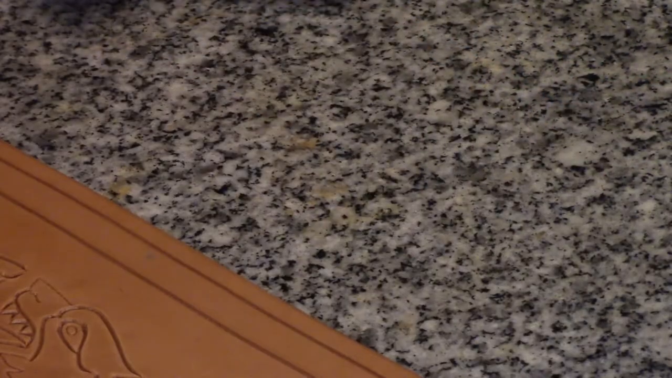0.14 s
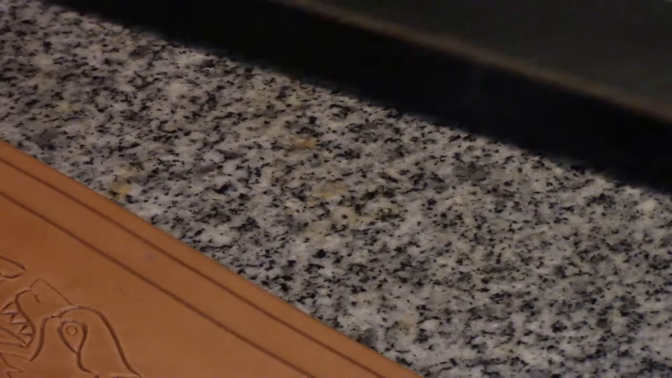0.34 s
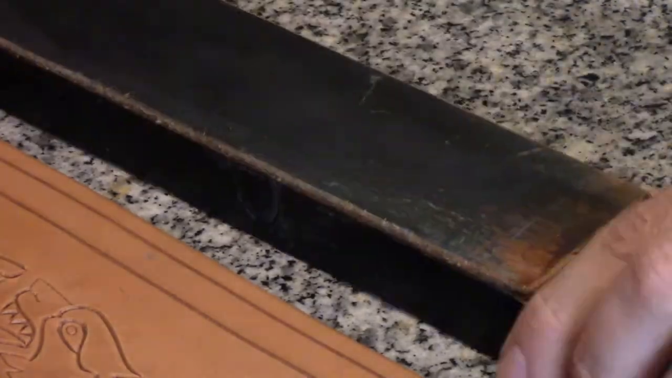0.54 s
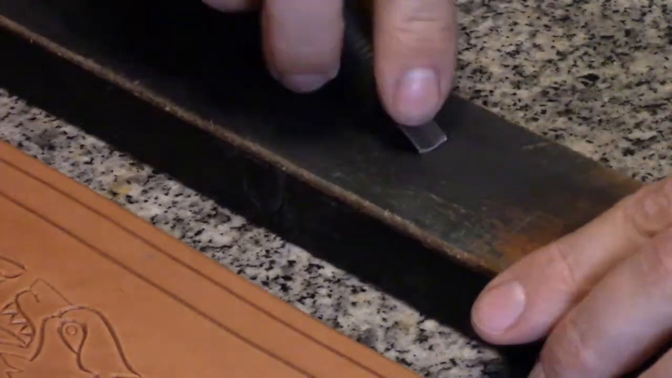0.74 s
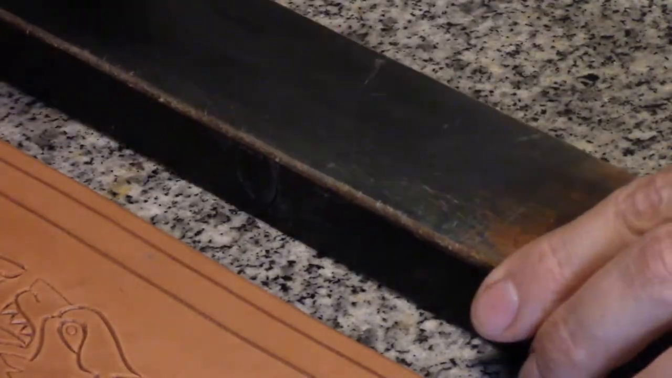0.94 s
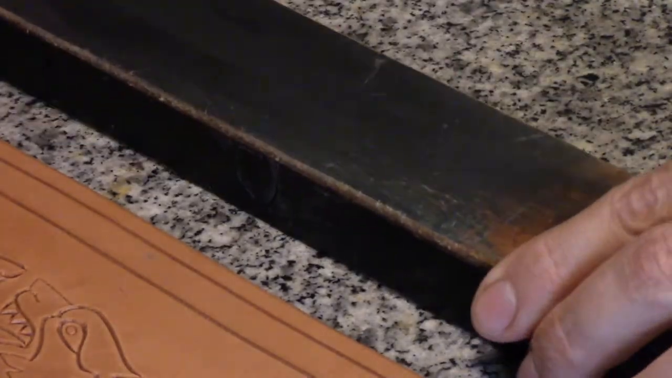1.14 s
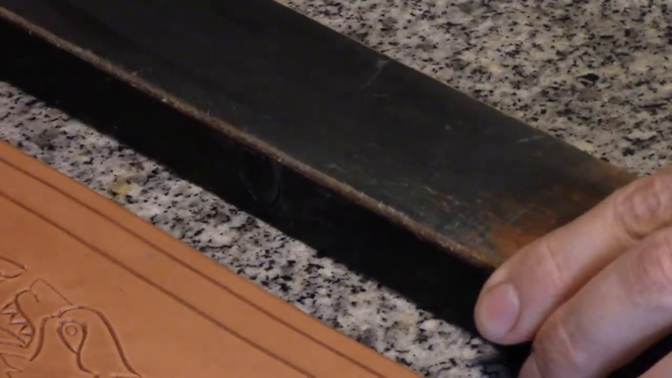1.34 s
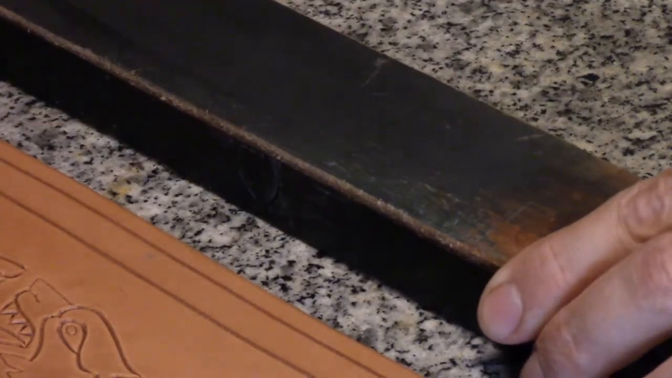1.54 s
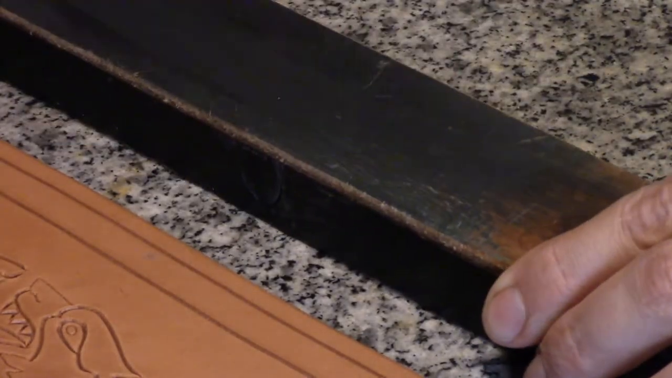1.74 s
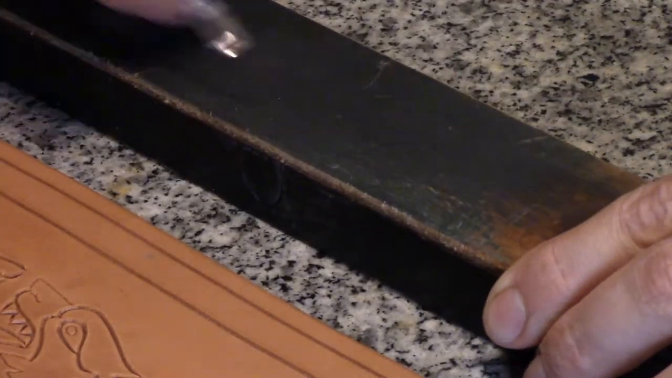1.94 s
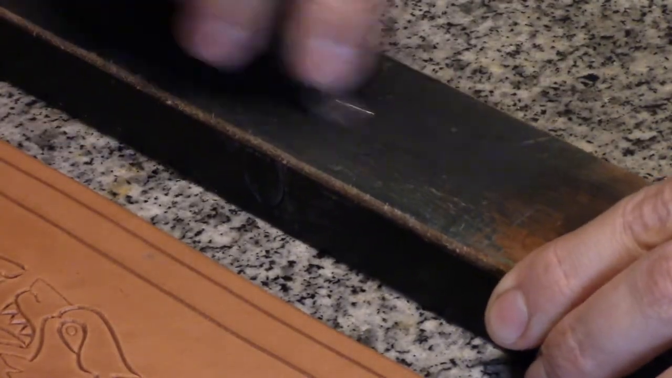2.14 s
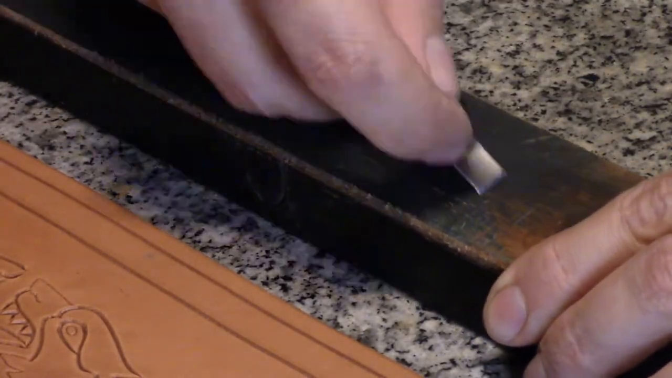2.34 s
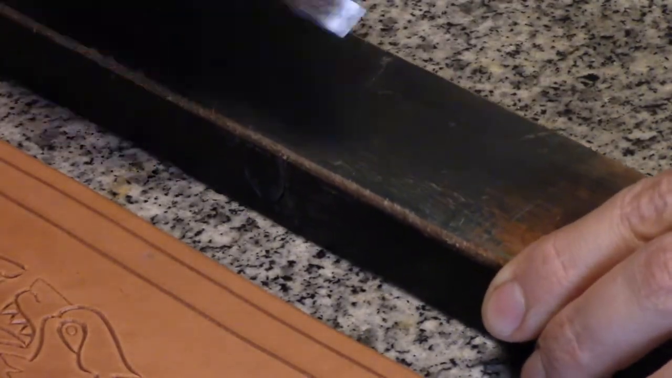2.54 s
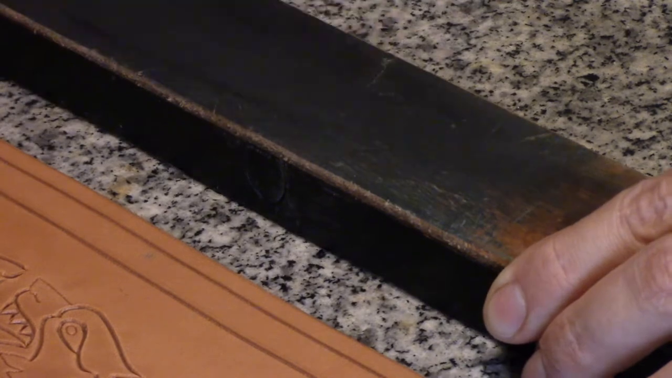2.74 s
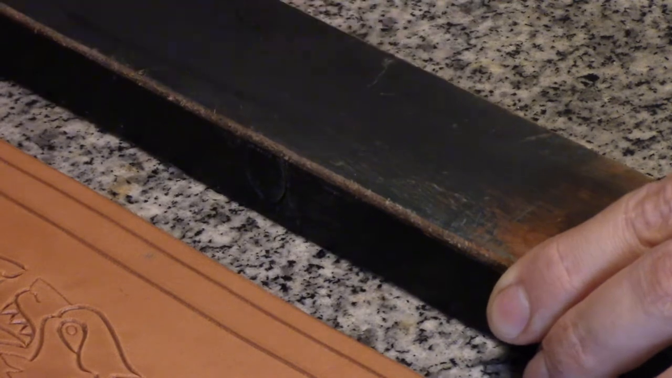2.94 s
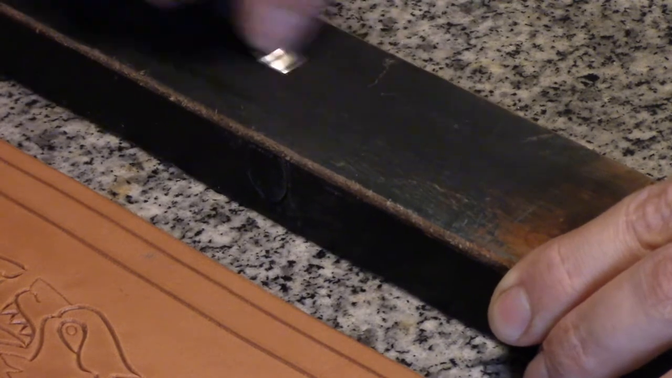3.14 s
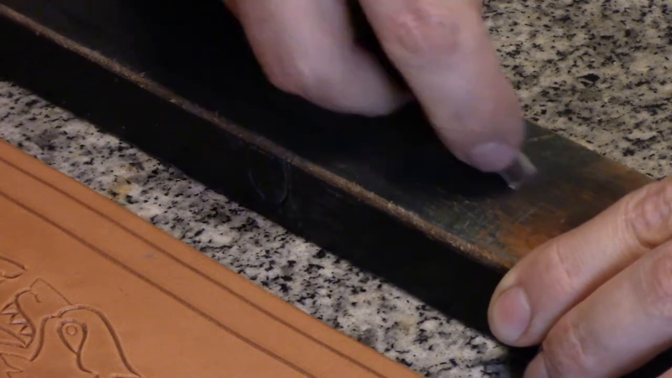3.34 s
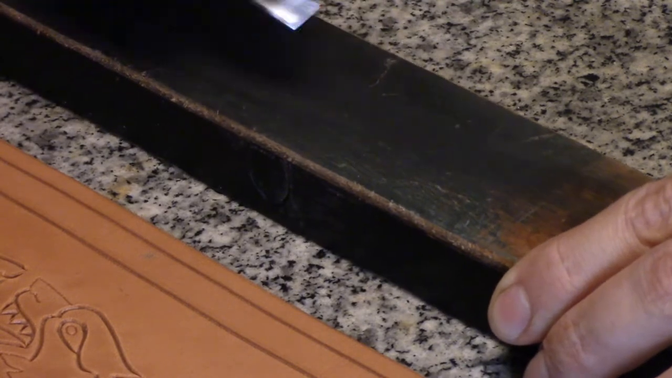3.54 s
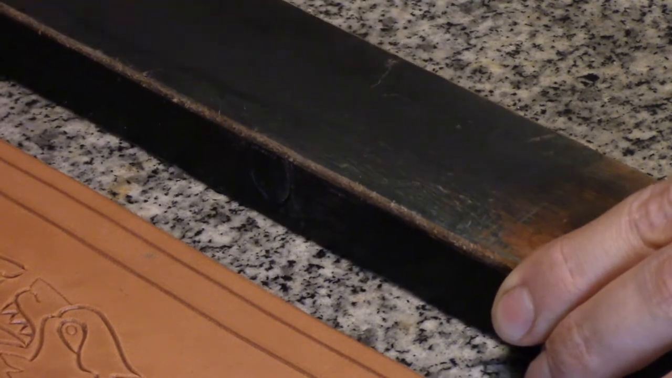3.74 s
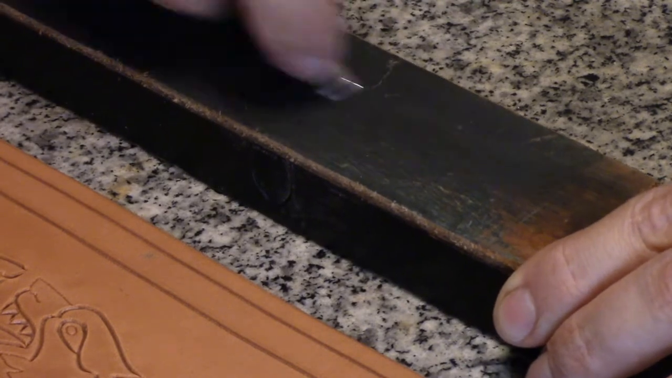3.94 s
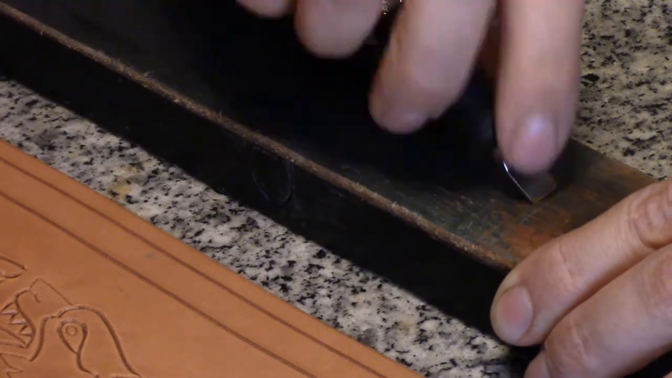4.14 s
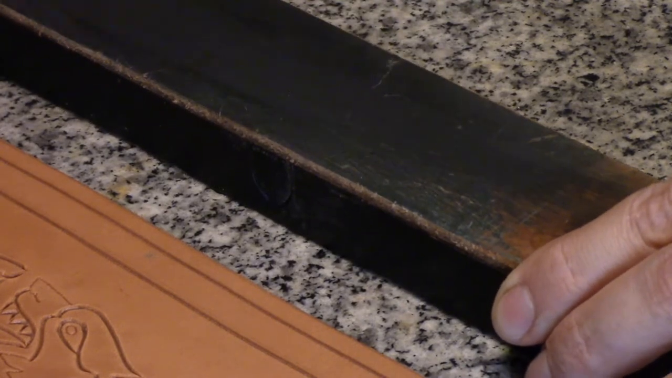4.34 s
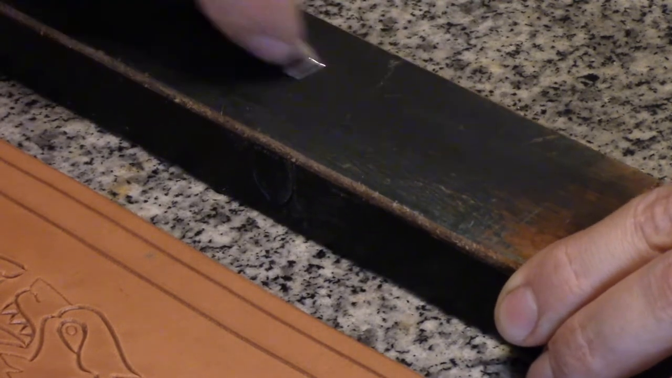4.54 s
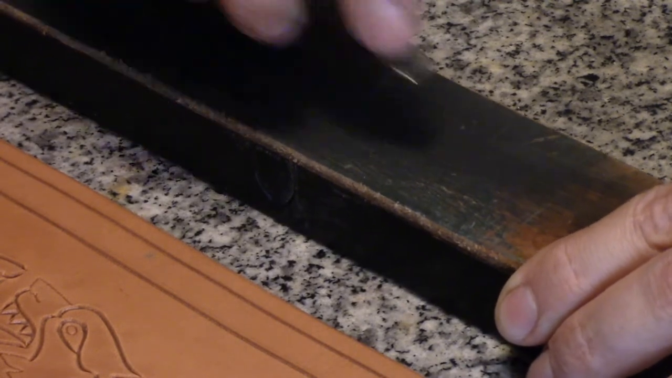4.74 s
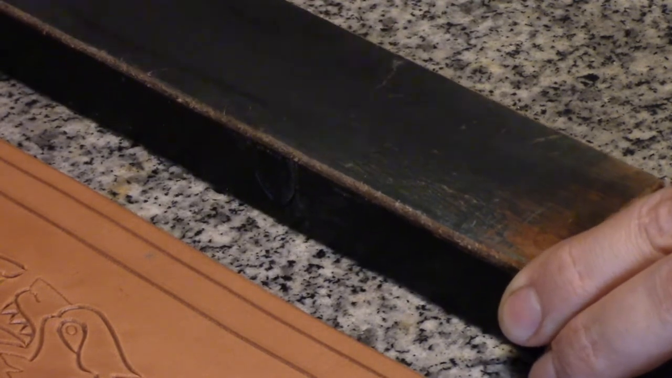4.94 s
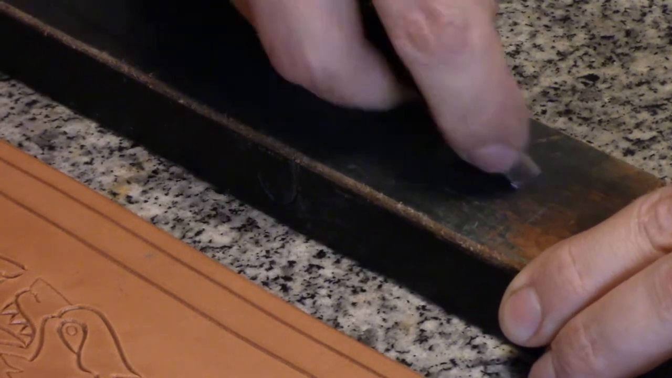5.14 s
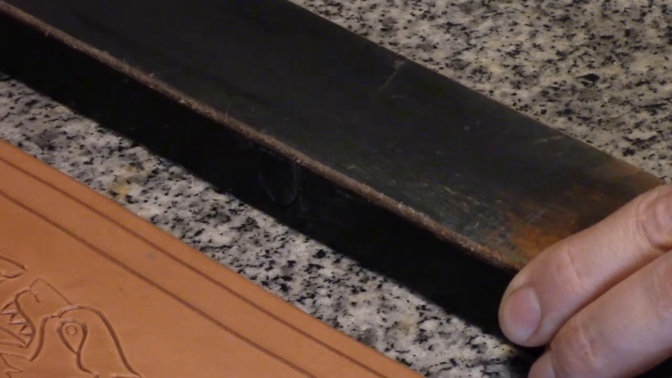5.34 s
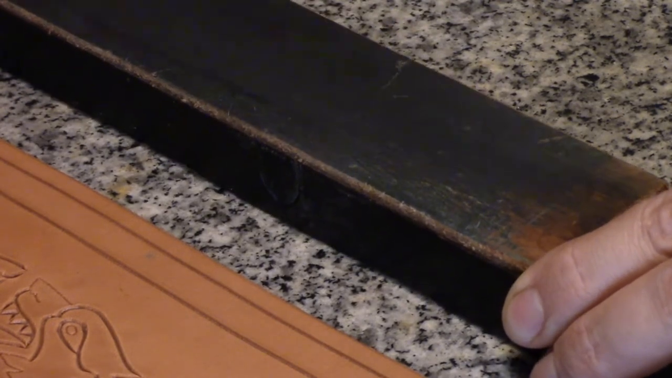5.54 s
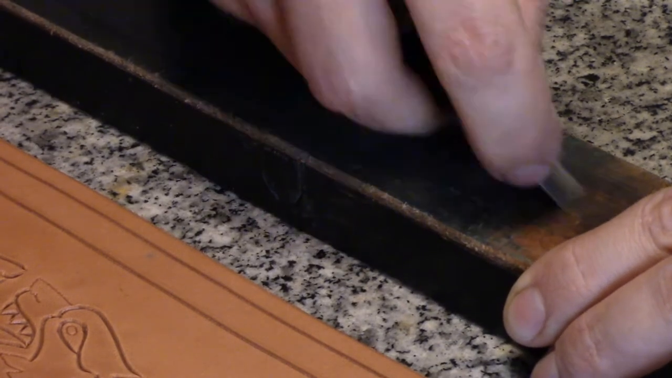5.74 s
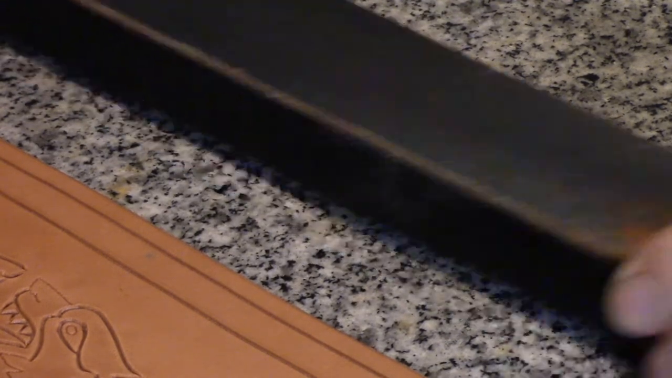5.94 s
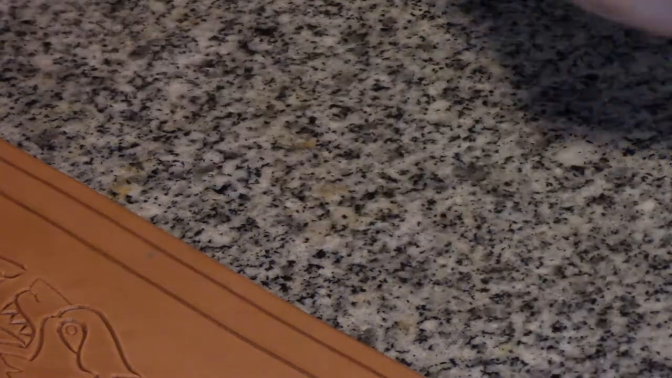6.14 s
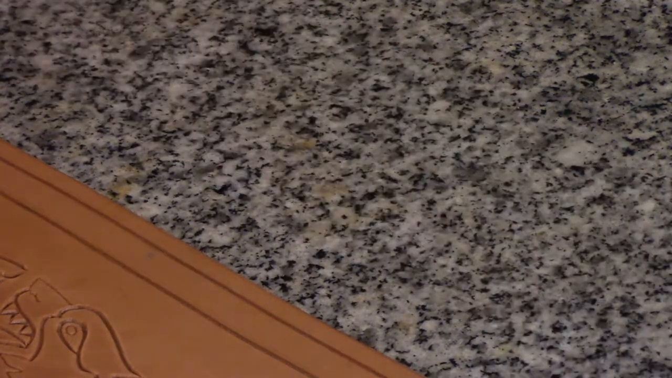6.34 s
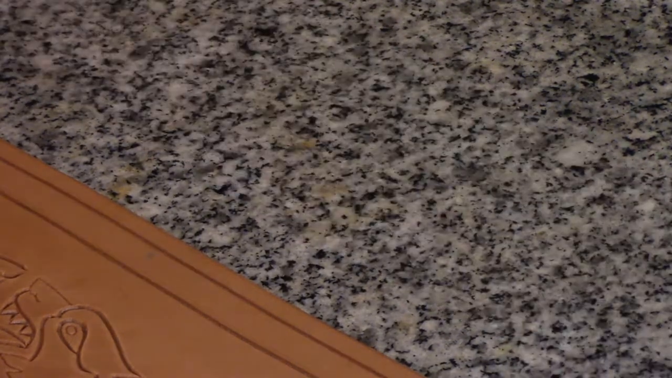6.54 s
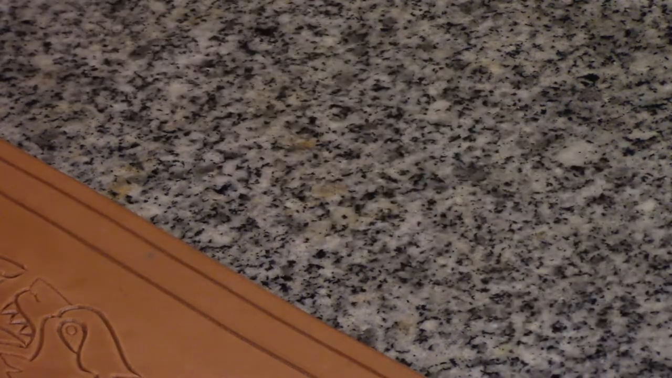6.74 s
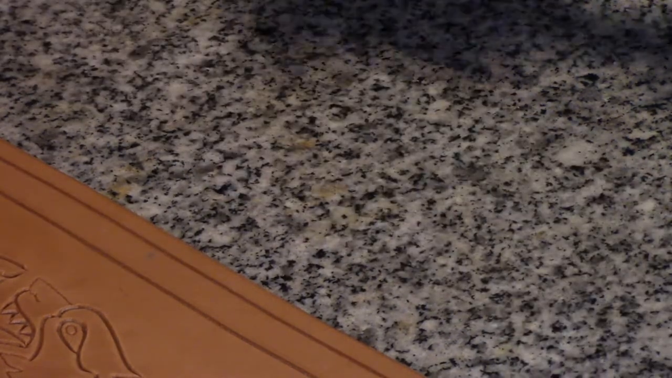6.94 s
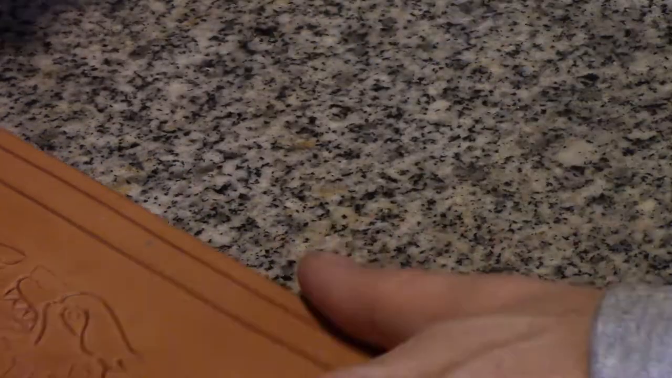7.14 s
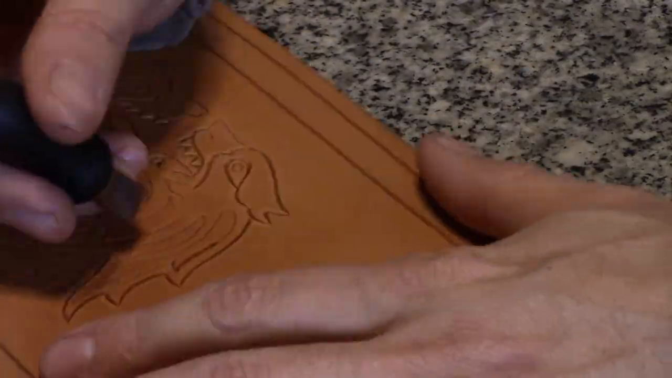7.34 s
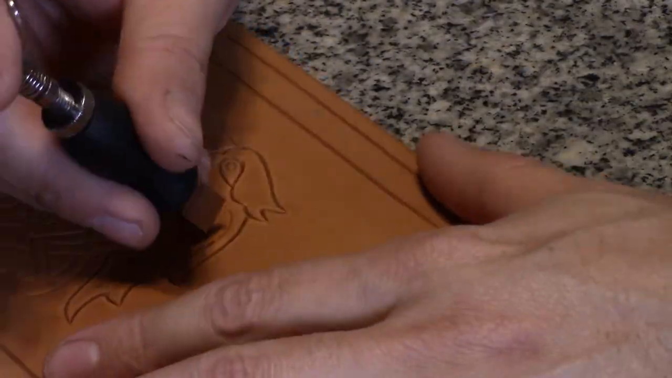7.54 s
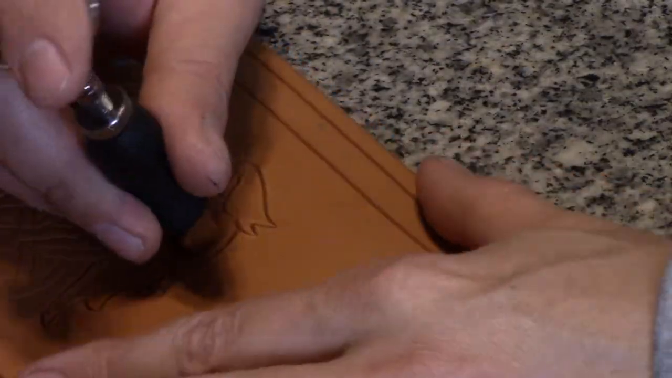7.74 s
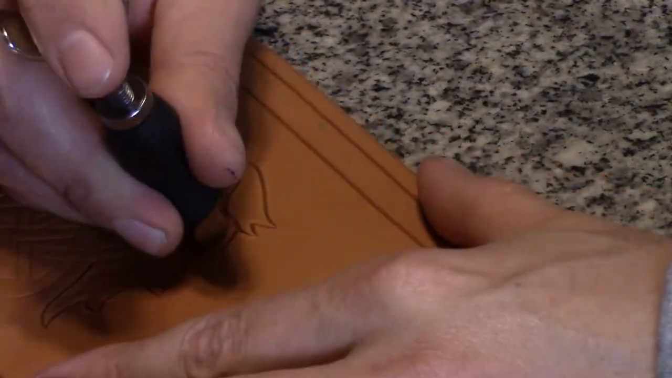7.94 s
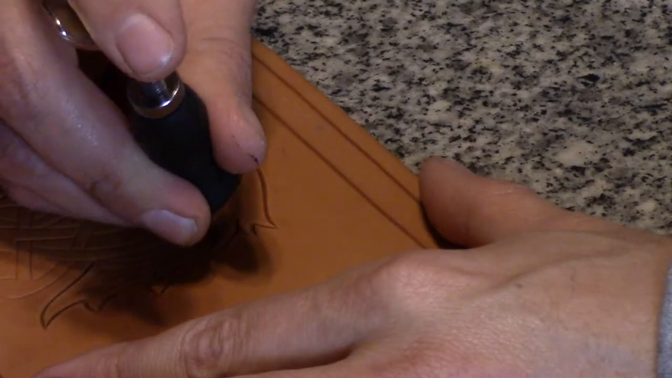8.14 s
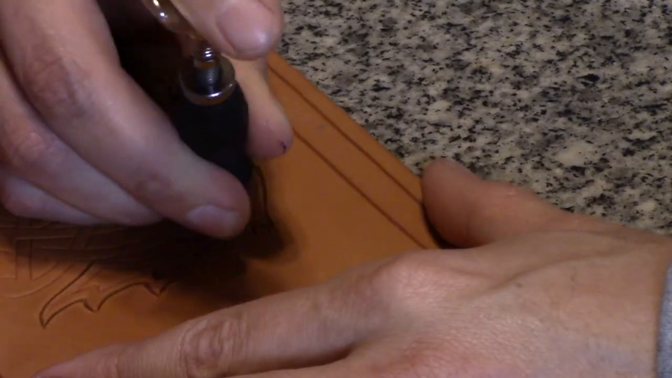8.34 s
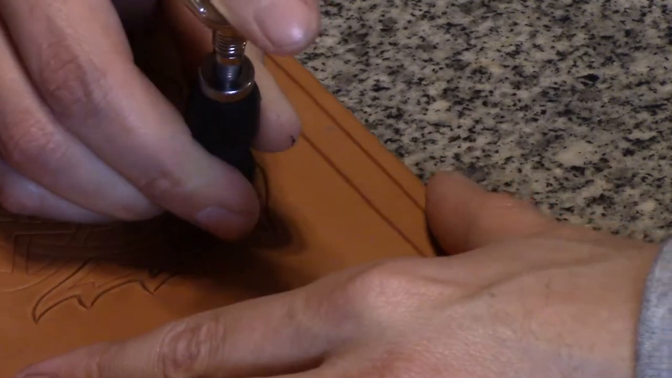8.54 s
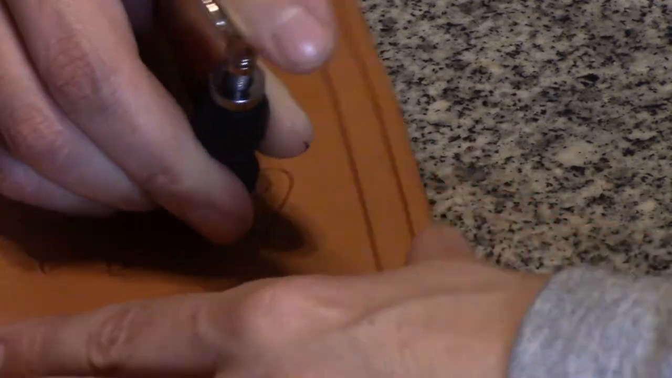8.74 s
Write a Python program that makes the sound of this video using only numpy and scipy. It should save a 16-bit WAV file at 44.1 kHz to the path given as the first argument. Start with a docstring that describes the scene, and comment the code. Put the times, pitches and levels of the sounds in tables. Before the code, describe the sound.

Close and dry: a sharp wooden clack on stone, an instant raspy squawk and a bright little clink. Small blade ticks come several times a second at first, later more widely spaced, some with a soft swish along leather. Around six seconds comes another bright knock, then grainy scuffs and hands brushing leather. Air noise and a fan hum throughout, joined by a second motor, with a thin electronic buzz.

```python
"""A leather-faced wooden strop lands on a stone counter, squawks as it slides, and is later put aside with a knock.
A small steel knife ticks at each touch and swishes along the leather; hands rub and shift things.
Blows excite decaying modes, stick-slip drives the squawk, and uneven friction noise drives the scrapes and swishes.
The workshop is small and dry, with a fan and a second motor humming; the camera adds a faint high buzz."""
import sys
import numpy as np
from scipy import signal
from scipy.fft import rfft, irfft, next_fast_len
from scipy.io import wavfile
from scipy.ndimage import uniform_filter1d

SR = 44100
rng = np.random.default_rng(int(sys.argv[2]) if len(sys.argv) > 2 else 0)


def transcribe(signal):
    """Save signal, clipped to [-1, 1], as a 16-bit WAV file at the path in sys.argv[1]."""
    frames = np.atleast_2d(signal).T
    limited = np.clip(frames, -1, 1)
    pcm = np.round(limited * 32767).astype(np.int16)
    wavfile.write(sys.argv[1], SR, pcm)


N = 391727
TIME = np.arange(N) / SR

# touches of the knife: [start_s, level_db, sharpness_db_per_octave in the treble,
# blade_ring_db above the level, shaft_hz]
TOUCHES = [(0.415, -43, -6, -5, 4180), (0.4254, -54.5, 2.5, 6, 4400), (0.4539, -61, -3, 3, 3700),
           (1.0138, -76, 9, 5, 3700), (1.0774, -58.5, 1.5, 5.5, 3660), (1.1955, -64.5, 6, -1, 3500),
           (1.2903, -52.5, 1, 11, 4900), (1.5084, -54.5, -1, 16, 3800), (1.6287, -68.5, 2.5, 2, 4800),
           (1.7318, -55, 1, 12, 3600), (1.955, -57.5, -1, 1, 3460), (2.1823, -58, -1.5, 0, 3800),
           (2.2893, -47, -5, 0.5, 4240), (2.415, -66, -1, 9.5, 4420), (2.4227, -70, 1, 4, 4400),
           (2.544, -43.5, -4.5, 0, 4640), (2.6718, -54, 0.5, -3.5, 3700), (2.9199, -56.5, 5.5, 13, 3900),
           (3.168, -54, 1, -1, 3740), (3.4034, -55, 5, 10, 3400), (3.6762, -58.5, 2.5, 3, 3600),
           (3.9545, -56, 2, 11.5, 3400), (4.2268, -56, -2, 0, 3700), (4.5317, -48.5, -5, 0, 3780),
           (4.8738, -62, 3.5, 1, 3500), (5.1954, -57.5, -3.5, -2, 3640), (5.514, -61, -4, -8, 3600),
           (5.809, -62.5, -4, -9, 3700), (5.8318, -68, 4, 9, 3700)]
# crack spectrum of the leather face: [frequency_hz, relative_db]
LEATHER_CRACK = [(59, -59), (100, -31), (433, -22), (736, -5), (1030, -1), (1390, 0), (1580, -6),
                 (2000, -0.5), (2860, -22), (4870, -12), (5420, -14.5), (6840, -24), (13800, -29),
                 (16000, -39)]


def undb(db):
    """Logarithmic level: decibels become an amplitude gain."""
    return 10 ** (np.asarray(db) / 20)


def unit(x):
    """Power normalisation: scale to rms 1."""
    return x / np.sqrt(np.mean(x ** 2))


def add(out, start_s, x):
    """Superposition: mix a sound in at its start time."""
    i = max(int(start_s * SR), 0)
    out[i:i + len(x)] += x[:len(out) - i]


def colour(x, points):
    """Spectral shaping: levels at (Hz, dB) points are joined along a logarithmic frequency axis."""
    point_hz, point_db = np.transpose(points)
    size = next_fast_len(len(x))
    hz = np.maximum(np.fft.rfftfreq(size, 1 / SR), 1)
    gain = undb(np.interp(np.log(hz), np.log(point_hz), point_db))
    return irfft(rfft(x, size) * gain, size)[:len(x)]


def resonate(x, hz, width_hz):
    """Damped resonance: two equal passes in series give steep skirts; the width is that of one pass."""
    b, a = signal.iirpeak(min(hz, SR / 2 - 1000), hz / width_hz, fs=SR)
    once = signal.lfilter(b, a, x)
    return signal.lfilter(b, a, once)


def voice(x, resonances):
    """Parallel resonances: one drive excites (Hz, width Hz, dB) resonances, each to its level."""
    return sum(undb(db) * unit(resonate(x, hz, width_hz)) for hz, width_hz, db in resonances)


def ring(modes, size=8192):
    """Modal impulse response: decaying (Hz, dB, t60 s) sines; neighbours in the list have opposite signs."""
    t = np.arange(size) / SR
    response = np.zeros(size)
    for k, (hz, db, t60) in enumerate(modes):
        response += (-1) ** k * undb(db - 60 * t / t60) * np.sin(2 * np.pi * hz * t)
    return response


def walk(rate_hz, size=8192):
    """Band-limited chance: normal random values, joined by straight lines, with a spread near 1."""
    return np.interp(TIME * rate_hz, np.arange(size), rng.standard_normal(size))


def stereo(mid, side):
    """Sum and difference: left and right from mid and side."""
    return np.array([mid + side, mid - side])


def catches(uneven_db, snag_db):
    """Dry friction: noise of dense, uneven catches between surfaces, with coarser snags."""
    catches_per_s, snags_per_s = 700, 90
    level_db = uneven_db * walk(catches_per_s) + snag_db * walk(snags_per_s)
    return rng.standard_normal(N) * undb(level_db)


def swell(x, middle_s, half_s, db):
    """Amplitude envelope: one movement rises and fades as a squared cosine; gives its start and sound."""
    i, j = max(int((middle_s - half_s) * SR), 0), min(int((middle_s + half_s) * SR), N)
    envelope = np.cos(np.pi / 2 * (TIME[i:j] - middle_s) / half_s) ** 2
    return i / SR, undb(db) * envelope * x[i:j]


def knocks():
    """Impact excitation: the strop lands in quick bounces, each a noisy crack and a short wooden ring."""
    # blows on the stone: [start_s, ring_db, crack_db, crack_t60_s, side struck: 0 leather face, 1 bare edge]
    blows = [(0.3372, -37.5, -18.5, 0.063, 0), (0.415, -51, -33, 0.03, 0), (0.4243, -52, -30, 0.022, 0),
             (6.1662, -40, -23, 0.063, 1), (6.1688, -34.5, -22, 0.068, 1), (6.1718, -40.5, -29, 0.054, 1)]
    # modes of the strop: [frequency_hz, relative_db, t60_s]
    strop_modes = [(353, -22, 0.081), (934.7, 0.5, 0.115), (1233, -1.5, 0.14), (1273, 9, 0.049),
                   (1438, 11, 0.061), (1720, 10, 0.03), (1840, 9.5, 0.07), (2140, -12, 0.06),
                   (2280, -5, 0.085), (2910, 2, 0.039), (3484, 5.5, 0.047), (3640, -18, 0.06),
                   (4140, -10, 0.07), (4520, -18, 0.08), (5800, -20, 0.07), (6375, -3.5, 0.056)]
    # crack spectrum of the bare edge: [frequency_hz, relative_db]
    edge_spectrum = [(59, -77), (100, -53), (415, -18), (721, -26.5), (891, -8), (1250, -0.5), (1550, -10),
                     (2220, -9), (2630, -14), (3470, -10), (3860, -18), (4200, -15), (4980, -22.5),
                     (14700, -25.5), (16000, -35.5)]
    out, body = np.zeros(N), ring(strop_modes)
    t = TIME[:len(body)]
    for start_s, ring_db, crack_db, t60, side in blows:
        spectrum = edge_spectrum if side > .5 else LEATHER_CRACK
        dense_modes = unit(colour(rng.standard_normal(len(t)), spectrum))
        crack = dense_modes * np.exp(-np.log(1000) * t / t60)
        add(out, start_s, undb(ring_db) * body + undb(crack_db) * crack)
    return out


def judder(jitter=0.029, uneven_db=8.0, grit_db=-7):
    """Stick-slip: slips ring the pressed strop into a squawk, rough at first, then locking to a steady rate."""
    # course of the slide: [time_s, slips_per_s, level_db, roughness (0-1)]
    slide = [(0.34, 346, -32, 0.9), (0.352, 342, -27.5, 1), (0.362, 335, -20, 0.67),
             (0.379, 337, -21, 0.38), (0.389, 338, -19, 0.06), (0.397, 338, -24.5, 0.11),
             (0.404, 339, -31, 0.4), (0.413, 339, -48.5, .3)]
    # strop modes while the hand presses it down: [frequency_hz, relative_db, t60_s]
    pressed_modes = [(336.7, -27.5, 0.0373), (1008, -16, 0.031), (1327.4, -4, 0.083), (1705, -12.5, 0.034),
                     (1986, -9, 0.098), (2390, -8.5, 0.012), (2710, -17.5, 0.07), (3118, -8, 0.018),
                     (3700, -11.5, 0.0198), (4370, -18, 0.016), (5130, -23, 0.013), (5550, -11.5, 0.01),
                     (6760, -19, 0.0096)]
    time_s, *columns = np.transpose(slide)
    t = np.arange(time_s[0], time_s[-1], 1 / SR)
    slips_per_s, level_db, roughness = (np.interp(t, time_s, column) for column in columns)
    rate = slips_per_s * (1 + jitter * roughness * walk(337)[:len(t)])
    phase = np.cumsum(rate) / SR
    # one band-limited impulse per slip, placed between samples
    impulses = np.sinc((phase - np.round(phase)) * SR / rate)
    slips = impulses * undb(uneven_db * roughness * walk(340)[:len(t)])
    squawk = unit(signal.fftconvolve(slips, ring(pressed_modes))[:len(t)])
    # friction holds the swing to the hand's push
    squawk = squawk / np.sqrt(uniform_filter1d(squawk ** 2, size=400) + 1e-6)
    # the grit is strongest at the start of each cycle
    grit_drive = rng.standard_normal(len(t)) * np.exp(-2 * (phase % 1))
    grit = unit(colour(grit_drive, LEATHER_CRACK))
    out = np.zeros(N)
    add(out, time_s[0], undb(level_db) * (squawk + undb(grit_db) * np.sqrt(np.abs(roughness)) * grit))
    return out


def narrow_body(x, low_hz=240):
    """Radiation efficiency: a narrow stick on massive stone radiates little bass."""
    return signal.sosfilt(signal.butter(3, low_hz, "high", fs=SR, output="sos"), x)


def blade(contact_s=0.00024, chatter_s=0.0022, chatter_db=-12, snap_db=-7, landing=6):
    """Contact excitation: a sharp snap and brief chatter drive the heavily damped knife and strop."""
    # handle, shank and fine edge: [frequency_hz, width_hz, level_db]
    knife_modes = [(2290, 1700, 1.5), (4870, 2200, -1.5), (11530, 2400, -3), (13610, 3400, 1)]
    shaft_width_hz, shaft_db = 1100, 3  # the shaft's pitch changes with the grip
    flat_hz, flat_width_hz = 7540, 1320  # the flat of the blade
    sharp_from_hz = 3800  # a sharper contact lifts everything above this
    thud_hz, thud_width_hz, thud_db = 945, 1300, -41.5  # the strop under the knife
    cushion = 0.35  # its leather passes only this share of a touch's level in dB
    out, t = np.zeros(N), np.arange(882) / SR
    for start_s, level_db, sharpness, ring_db, shaft_hz in TOUCHES:
        decay = np.exp(-t / contact_s) + undb(chatter_db) * np.exp(-t / chatter_s)
        contact = rng.standard_normal(len(t)) * decay
        contact[0] += landing  # the edge lands first
        resonances = [(shaft_hz, shaft_width_hz, shaft_db), (flat_hz, flat_width_hz, ring_db)]
        for hz, width_hz, mode_db in knife_modes:
            octaves = max(np.log2(hz / sharp_from_hz), 0)
            resonances.append((hz, width_hz, mode_db + sharpness * octaves))
        steel = voice(contact, resonances)
        snap = undb(snap_db) * unit(contact)  # the contact itself radiates at all frequencies
        thud = voice(contact, [(thud_hz, thud_width_hz, thud_db + cushion * level_db)])
        add(out, start_s, undb(level_db) * (steel + snap) + thud)
    return out


def clink(burst_s=0.005, burst_hz=11000, burst_width_hz=9000):
    """Modal ring: one short steel clink with a brief, bright burst of noise, drawn separately for left and right."""
    # modes of the steel: [frequency_hz, relative_db, t60_s]
    steel_modes = [(4420, 0, 0.05), (4560, -17.5, 0.06), (6960, -7, 0.032)]
    start_s, ring_db, burst_db = 0.415, -30.5, -31
    out, body = np.zeros((2, N)), undb(ring_db) * ring(steel_modes)
    decay = np.exp(-TIME[:len(body)] / burst_s)
    for channel in out:
        burst = unit(resonate(rng.standard_normal(len(body)), burst_hz, burst_width_hz))
        add(channel, start_s, body + undb(burst_db) * burst * decay)
    return out


def swishes():
    """Friction noise: the blade is drawn along leather shortly after a touch; hands brush in the same way."""
    # hands or blade brushing over leather and stone: [middle_s, half_length_s, level_db]
    brushes = [(0.04, 0.092, -60.5), (0.663, 0.107, -59), (2.265, 0.047, -59), (2.536, 0.017, -53),
               (6.01, 0.11, -63), (6.53, 0.26, -63), (6.87, 0.092, -62), (7.258, 0.065, -56.5),
               (7.386, .066, -66), (7.798, .03, -64), (8.82, .063, -67)]
    # resonances that sliding on leather excites: [frequency_hz, width_hz, level_db]
    leather_modes = [(1260, 1040, -3.5), (4500, 3950, 0), (12140, 7000, -.5)]
    # span in which touches lead to strokes: [from_s, to_s]
    stropping = (1.9, 4.3)
    lag_s, half_s, stroke_db = 0.11, 0.055, -59.5
    needed_s = .2  # no stroke if the next touch comes sooner
    out, leather = np.zeros(N), voice(catches(uneven_db=3.5, snag_db=3.5), leather_modes)
    starts = [touch[0] for touch in TOUCHES]
    strokes = [(start_s + lag_s, half_s, stroke_db) for start_s, next_s in zip(starts, starts[1:])
               if stropping[0] < start_s < stropping[1] and next_s - start_s > needed_s]
    for movement in [*strokes, *brushes]:
        add(out, *swell(leather, *movement))
    return out


def scuffs():
    """Friction excitation: the shifting strop scrapes dully with more or less grit; the counter bumps once."""
    # shifts of the strop on the stone: [middle_s, half_length_s, level_db, grit_db relative to the level]
    shifts = [(0.42, 0.05, -45, -5.5), (0.489, 0.078, -46.5, -9), (0.747, 0.053, -41, -4.5),
              (0.885, 0.0136, -46.5, 0), (1.432, .022, -46, -11), (1.663, .026, -46.5, -11),
              (1.869, 0.031, -49, -12), (2.14, .015, -53, -16), (2.413, .029, -52, -14),
              (6.161, 0.0079, -42.5, 1), (6.617, 0.025, -50, 3), (6.901, 0.016, -43.5, -17),
              (6.925, 0.023, -46.5, -7), (6.966, .023, -44.5, -1.5)]
    # resonances of the counter, then the wood: [frequency_hz, width_hz, level_db]
    wood_modes = [(337, 130, -19.5), (1203, 830, -0.5)]
    # resonances of the grit between them: [frequency_hz, width_hz, level_db]
    grit_modes = [(4240, 6600, 0), (12300, 3230, -4.5)]
    # the hand turns the leather on the counter: [middle_s, half_length_s, level_db]
    bump = (8.787, 0.0186, -61.5)
    out, friction = np.zeros(N), catches(uneven_db=2.5, snag_db=.5)
    wood = voice(friction, wood_modes)
    grit = voice(catches(uneven_db=4.2, snag_db=.5), grit_modes)
    for middle_s, half_s, level_db, grit_db in shifts:
        add(out, *swell(wood + undb(grit_db) * grit, middle_s, half_s, level_db))
    counter_hz, counter_width_hz, _ = wood_modes[0]
    counter = unit(resonate(friction, counter_hz, counter_width_hz))
    add(out, *swell(counter, *bump))
    return out


def snaps():
    """Unit impulse: bare dry clicks with no ring and no echo."""
    # clicks: [start_s, level_db]
    clicks = [(0.2906, -14.5), (0.3906, -18), (6.169, -21)]
    out = np.zeros(N)
    for start_s, level_db in clicks:
        add(out, start_s, undb([level_db]))  # a single sample
    return out


def room(x, wet_db, t60, size=16384):
    """Reverberation: dense early echoes from the counter and near walls; only their treble is wide."""
    # width of the echoes: [frequency_hz, side_minus_mid_db]
    echo_width = [(200, -34), (2000, -47), (4500, -33.5), (8000, -17), (15000, -21)]
    t = TIME[:size]
    onset = np.clip(t / 0.0012 - .5, 0, 1)
    fade = np.exp(-np.log(1000) * t / t60) * onset
    mid, side = rng.standard_normal((2, size)) * fade / np.sqrt(np.sum(fade ** 2))
    response = stereo(mid, colour(side, echo_width))
    echoes = signal.fftconvolve(x[None], response, axes=1)[:, :N]
    return x + undb(wet_db) * echoes


def tones(lines, waver_hz=1.993, flutter_db=1.0):
    """Line spectrum: machine tones that waver a little in pitch and strength."""
    out = np.zeros(N)
    for hz, level_db in lines:
        strength = np.sqrt(2) * undb(level_db + flutter_db * walk(4.6))  # a sine of rms 1 peaks at sqrt 2
        cycles = np.cumsum(hz + waver_hz * walk(25)) / SR
        out += strength * np.sin(2 * np.pi * cycles)
    return out


def workshop():
    """Broadband flow noise with rotational tones: moving air and a fan; a second motor joins in."""
    # spectrum of the moving air: [frequency_hz, relative_db]
    air_spectrum = [(15, -70), (25, -31.5), (195, -29), (223, -24.5), (405, -16.5), (439, -12),
                    (641, -10.5), (695, -14.5), (754, -9), (840, -11), (1160, -8.5), (1440, -10),
                    (4250, -17.5), (8140, -21), (16000, -30)]
    # width of the air sound: [frequency_hz, side_minus_mid_db]
    air_width = [(60, 1.5), (200, -5.5), (700, -11.5), (1300, -10), (2400, -7.5), (15000, -7.5)]
    # tones of the fan, then of the second motor: [frequency_hz, level_db]
    fan_lines = [(435, -77.5), (868, -68), (1303, -74), (1738, -75.5), (2171, -72)]
    motor_lines = [(228, -87.5), (687, -66.5), (710, -73), (1146, -70), (1190, -75)]
    air_db, motor_start_s = -58, 2.715
    mid, side = (unit(colour(rng.standard_normal(N), air_spectrum)) for _ in range(2))
    air = stereo(mid, colour(side, air_width)) * undb(air_db + .5 * walk(3.7))
    running = np.clip((TIME - motor_start_s) / 0.18 + .5, 0, 1)  # a 0.18 s rise about the start
    return air + tones(fan_lines) + running * tones(motor_lines)


def buzz(db=-65.5, low_db=-3.5, low_hz=7590, high_hz=8220, width_hz=620, burst_s=0.00031,
         settled_s=7.2, dip_db=-6):
    """Beating: two trains of tiny bursts make the camera's buzz, which falters and rests until it settles."""
    # silences of the buzz: [from_s, to_s]
    rests = [(0.08, 0.3), (7.0, 7.17)]
    bursts = sum(np.exp(-(TIME % (1 / per_s)) / burst_s) for per_s in (106.6, 133.2))
    drive = bursts * rng.standard_normal(N)
    high = resonate(drive, high_hz, width_hz)
    low = resonate(drive, low_hz, width_hz)
    sound = unit(high + undb(low_db) * low)
    faltering = (walk(35) > 1) & (TIME < settled_s)
    strength = np.where(faltering, undb(dip_db), 1)
    for from_s, to_s in rests:
        strength = strength * ((TIME < from_s) | (TIME > to_s))
    return undb(db) * sound * uniform_filter1d(strength, 200)


def scene():
    """Superposition of near sources: wood, steel and leather each have their own echoes."""
    wood = room(narrow_body(knocks() + judder()), wet_db=-15.0, t60=0.13)
    steel = room(blade(), wet_db=-4, t60=0.071)
    leather = room(scuffs() + swishes(), wet_db=-5.0, t60=0.15)
    return wood + steel + leather + clink() + snaps() + workshop() + buzz()


def record(dry):
    """Saturation and band-limiting: the recorder rounds the very loudest peaks and cuts the top."""
    ceiling, top_hz = .3, 16100  # the ceiling is an amplitude
    rounded = dry / (1 + (dry / ceiling) ** 4) ** .25
    return signal.sosfilt(signal.ellip(10, .2, 75, top_hz, fs=SR, output="sos"), rounded)


dry = scene()
out = record(dry)
transcribe(out)
```